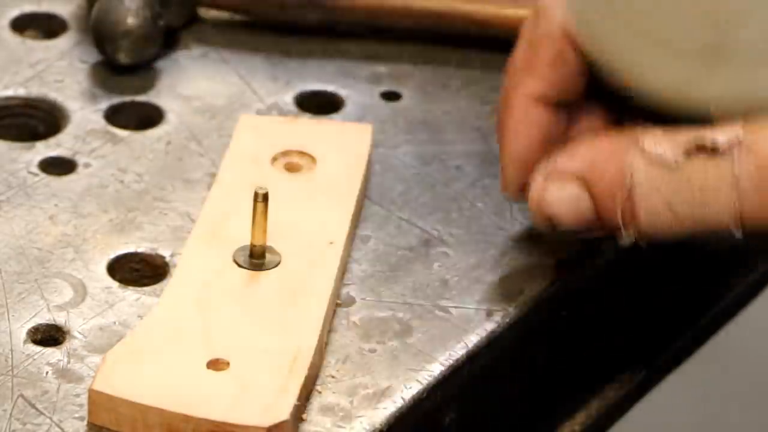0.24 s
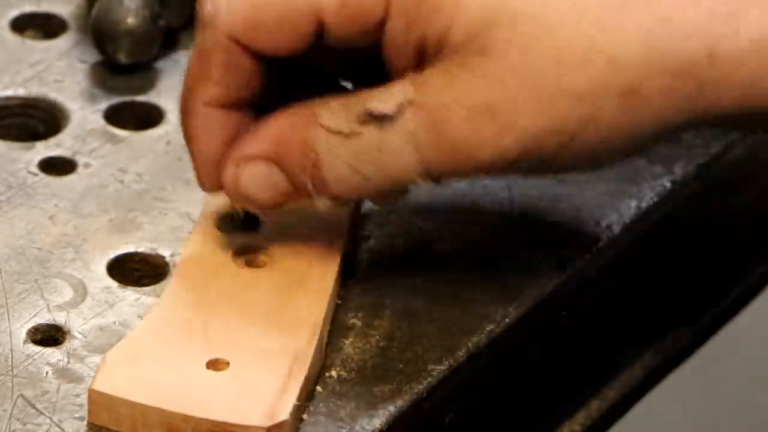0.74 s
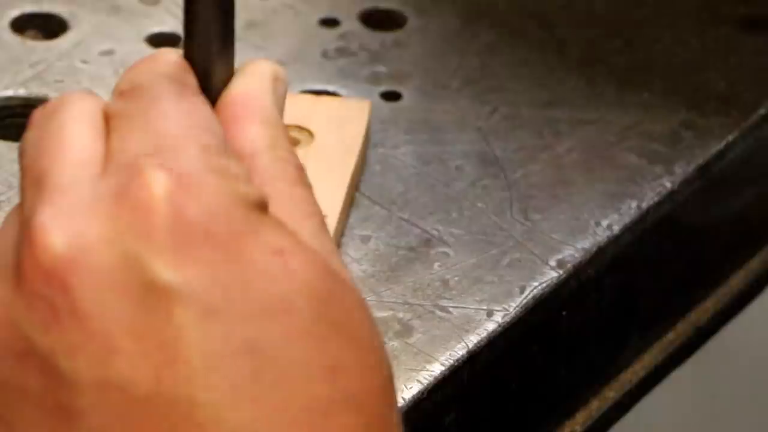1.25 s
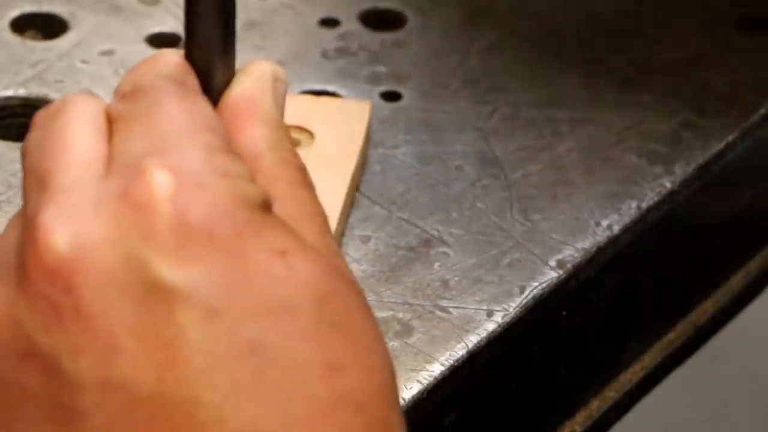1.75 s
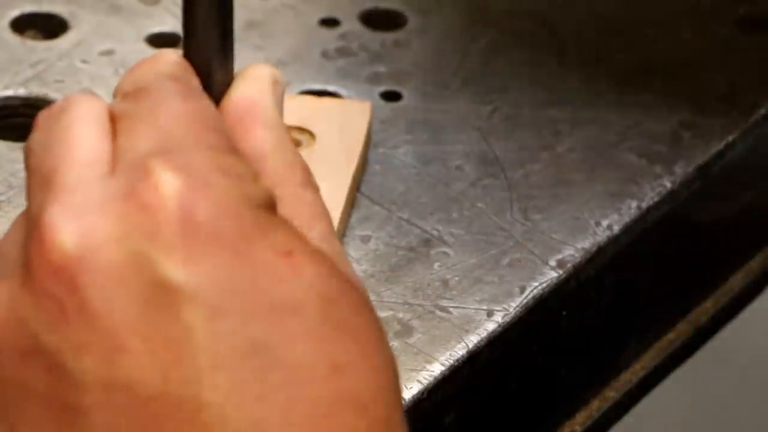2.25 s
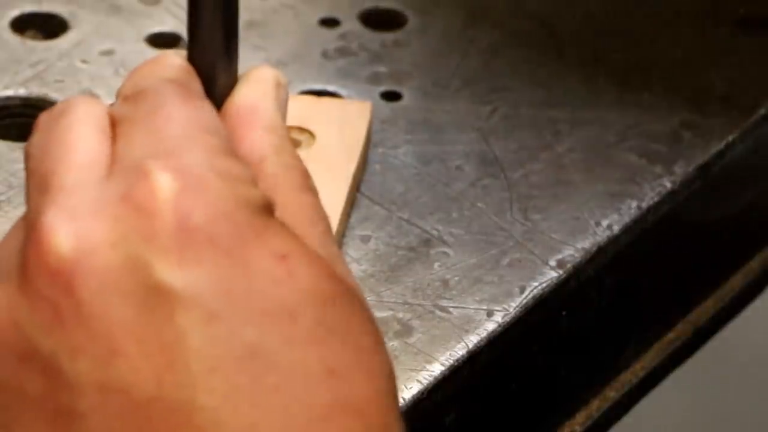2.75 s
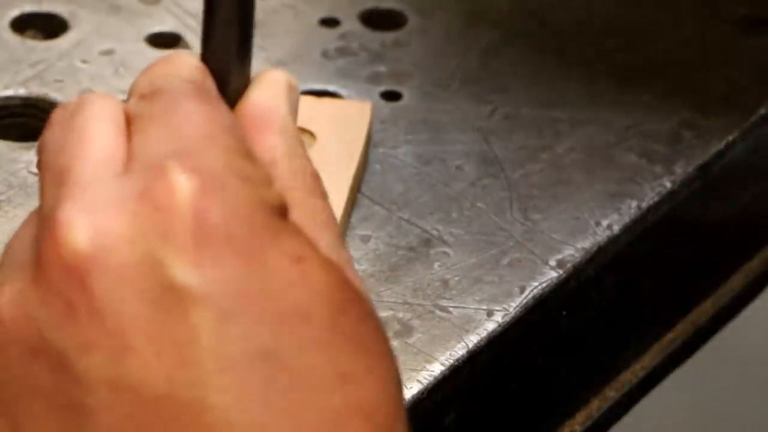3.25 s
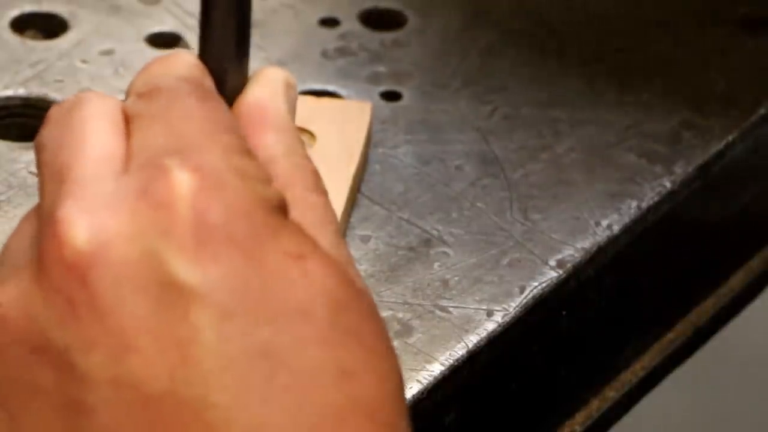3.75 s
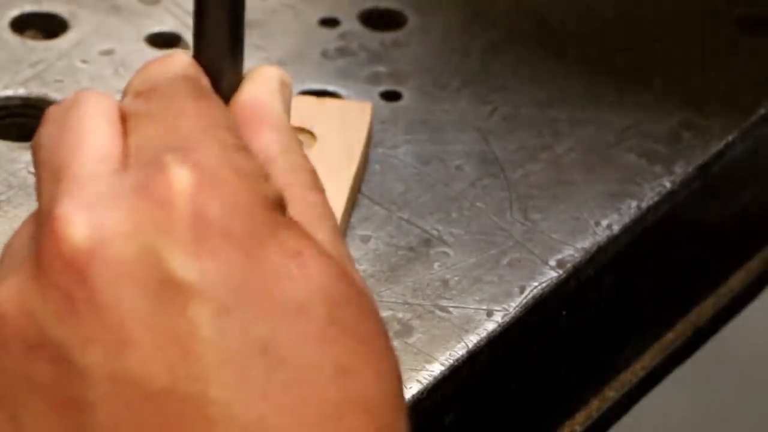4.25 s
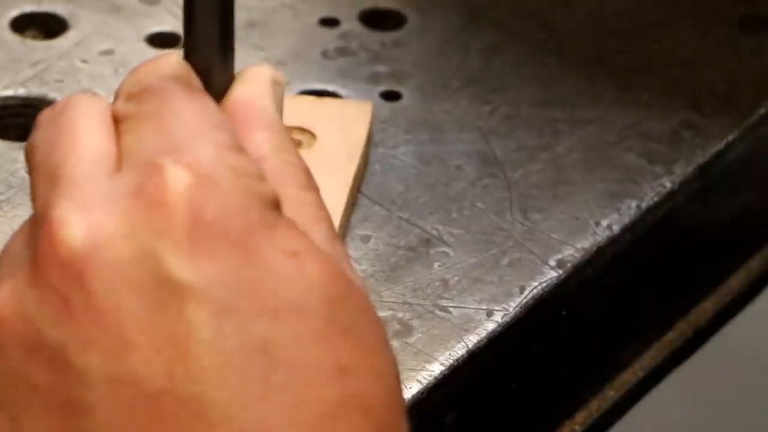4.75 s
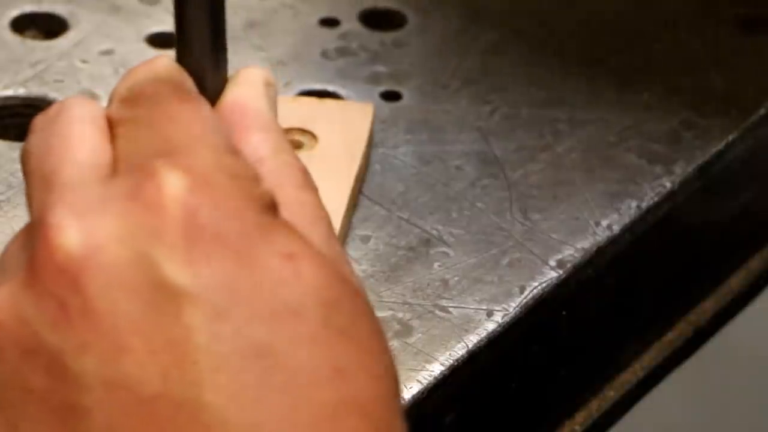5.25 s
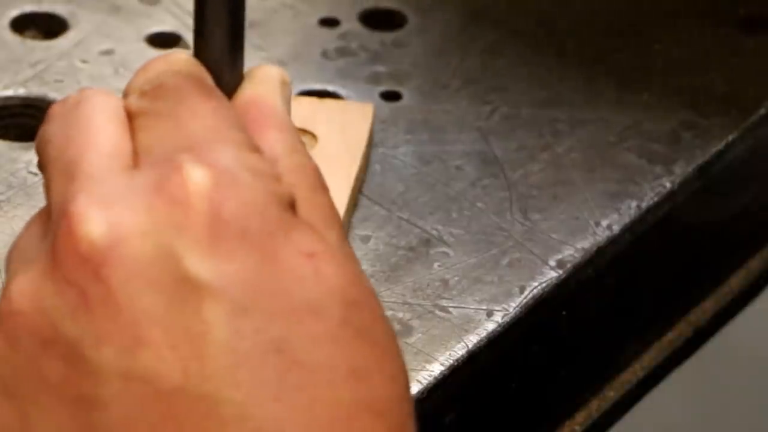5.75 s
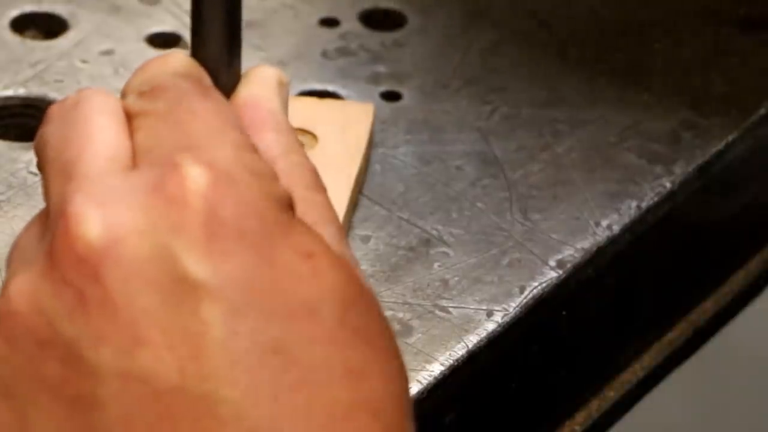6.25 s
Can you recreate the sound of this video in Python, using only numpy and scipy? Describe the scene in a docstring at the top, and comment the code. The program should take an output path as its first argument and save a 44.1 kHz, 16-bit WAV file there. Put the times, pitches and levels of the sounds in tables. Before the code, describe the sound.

Close mono sound at a steel workbench: soft fan noise, faint handling ticks, a punch set down on a pin, then six loud, evenly paced hammer strikes. Steel cracks sharply against steel, wood knocks on the plate, and the plate clangs briefly. Some blows have a tiny chattering rebound. The attacks distort, and gain control pulls up the short, bright room tail between them.

```python
"""In a small workshop, light touches and ticks lead into six hammer blows while a fan runs behind.
The hammer drives a hand-held steel punch onto a pin in a wooden handle scale on a steel bench plate.
Noise bursts make the cracks, decaying sines the knocks and rings, and filtered noise the fan.
The close mono microphone overloads; its gain control ducks each blow, then lifts the reverberation back up."""
import sys
import numpy as np
from scipy import signal
from scipy.fft import rfft, irfft
from scipy.io import wavfile
from scipy.ndimage import uniform_filter1d

SR = 44100
rng = np.random.default_rng(int(sys.argv[2]) if len(sys.argv) > 2 else 0)


def wrap_up_sound(samples):
    """Save the sound to the file named by the first command line argument, as 16-bit audio."""
    columns = np.atleast_2d(samples).T
    # keep every value between -1 and 1, then stretch to whole-number steps
    tamed = np.clip(columns, -1, 1)
    steps = np.round(tamed * 32767).astype(np.int16)
    wavfile.write(sys.argv[1], SR, steps)


N = 286209   # length [samples]
WOOD_LAG_S = 0.0045   # the wood is driven down a moment after the contact


def from_db(db):
    """Turns decibels into an amplitude factor."""
    return 10 ** (np.asarray(db) / 20)


def rms_one(x):
    """Scales a sound to rms 1."""
    return x / np.sqrt(np.mean(x ** 2) + 1e-20)


def at_hz(points, hz):
    """Reads a table along a log-frequency axis."""
    knots, values = np.transpose(points)
    return np.interp(np.log(np.maximum(hz, 1)), np.log(knots), values)


def coloured_noise(spectrum, size):
    """Steady noise of the given colour, at rms 1."""
    hz = np.fft.rfftfreq(size, 1 / SR)
    white = rfft(rng.standard_normal(size))
    return rms_one(irfft(white * from_db(at_hz(spectrum, hz)), size))


def resonance(x, hz, width_hz):
    """Two-pole band-pass with about unit gain on top; a narrower width rings longer."""
    r = np.exp(-np.pi * width_hz / SR)
    b = np.array([1, 0, -1]) * (1 - r * r) / 2
    a = [1, -2 * r * np.cos(2 * np.pi * hz / SR), r * r]
    return signal.lfilter(b, a, x)


def peak(x, hz, width_hz, db):
    """Lifts or cuts one band."""
    w, spread, half_gain = 2 * np.pi * hz / SR, np.pi * width_hz / SR, from_db(db / 2)
    b, a = ([1 + side, -2 * np.cos(w), 1 - side] for side in (spread * half_gain, spread / half_gain))
    return signal.lfilter(b, a, x)


def fade(t, t60):
    """Free decay from t = 0, silent before; it falls 60 dB in t60 seconds."""
    return (t >= 0) * np.exp(-np.log(1000) * np.maximum(t, 0) / t60)


def add(out, s, sound):
    """Mixes a sound in at time s [s]."""
    start = int(round(s * SR))
    out[start:start + len(sound)] += sound[:N - start]


# colour of the steady air noise and hiss: (frequency [Hz], relative level [dB])
AIR_COLOUR = [(15, -56), (25, -22), (64, -14), (96, -25), (133, -5.5), (227, -5), (305, -9.5), (331, -4.5),
              (359, -19), (399, -6.5), (567, -8.5), (722, -5.5), (2850, -35.5), (8810, -22.5), (15500, -29)]
# fan rumble and housing resonances: (frequency [Hz], width [Hz], rms level [dB])
FAN_RESONANCES = [(28, 6.2, -46), (64.4, 44, -56), (150, 22, -48), (232, 27, -47), (337.4, 19, -51),
                  (760, 55, -51.5), (1425, 560, -46.5)]


def fan():
    """Steady air noise with a few hollow resonances, over a faint rumble."""
    drone = np.zeros(N)
    for hz, width_hz, level_db in FAN_RESONANCES:
        drone += from_db(level_db) * rms_one(resonance(rng.standard_normal(N), hz, width_hz))
    air = from_db(-41.5) * coloured_noise(AIR_COLOUR, N)
    return air + drone


def tap(level_db, hz, width_hz, t60):
    """A light contact: a dying noise burst excites one resonance, at the given peak level."""
    t = np.arange(SR // 2) / SR
    burst = rng.standard_normal(len(t)) * fade(t, t60)
    tick = resonance(burst, hz, width_hz)
    return from_db(level_db) * tick / np.abs(tick).max()


# light touches of the parts being handled:
# (time [s], peak level [dB], ring frequency [Hz], width [Hz], t60 of the burst [s])
TOUCHES = [(0.895, -41, 3630, 500, .25), (1.019, -33, 1500, 400, .06), (1.135, -37, 2030, 150, .15)]
# the punch ticks as it is set on the pin:
# (frequency [Hz], width [Hz], peak level [dB], t60 of the burst [s])
PUNCH_TICK = [(3700, 1400, -38, .1), (4850, 450, -30, .028), (8300, 370, -34, 0.02)]


def handling():
    """Before the first blow the parts are touched and the punch is set on the pin."""
    out = np.zeros(N)
    for s, level_db, hz, width_hz, t60 in TOUCHES:
        add(out, s, tap(level_db, hz, width_hz, t60))
    tick = sum(tap(level_db, hz, width_hz, t60) for hz, width_hz, level_db, t60 in PUNCH_TICK)
    add(out, 1.113, tick)
    return out


def low_push(t, hz, t60):
    """One low, dying sine under the blow, as the overloaded microphone gives."""
    return np.sin(2 * np.pi * hz * t) * fade(t, t60)


def bench(t, level_db, low_hz, high_hz, t60, build_s):
    """The bench frame's crowded low modes, as banded noise, fill in between the plate's rings."""
    band = signal.butter(2, [low_hz, high_hz], "band", fs=SR, output="sos")
    crowd = rms_one(signal.sosfilt(band, rng.standard_normal(len(t))))
    return from_db(level_db) * crowd * np.minimum(t / build_s, 1) * fade(t, t60)


# long rings of the bench plate: (frequency [Hz], relative level [dB], t60 [s])
PLATE_RINGS = [(249, -8.5, 0.22), (693, -1, 0.2), (868, 6.5, 0.2), (931, -1.5, 0.38), (970, 1, 0.24),
               (1236, -3, 0.18), (1313, -0.5, 0.22), (1360, -17, 0.47), (1552, -16, 0.47),
               (1825, -8.5, 0.27), (2060, -6, 0.27), (2160, -6, 0.26), (2360, -16, 0.28), (2412, -14, 0.29),
               (2780, -15.5, 0.45), (2950, -11, 0.29), (2925, -15, 0.3), (3500, -19, 0.52),
               (3584, -15, 0.37)]


def plate(t, level_db, push_s, blur, waver_per_s):
    """The pin bottoms out just after the contact and rings the plate; reflections make each mode waver."""
    knots = np.arange(40) / waver_per_s
    diffuse = blur * np.minimum(t * waver_per_s, 1)   # the reflections take a moment to build up
    out = np.zeros(len(t))
    for k, (hz, db, t60) in enumerate(PLATE_RINGS):
        drift = rng.standard_normal(len(knots)) + 1j * rng.standard_normal(len(knots))
        echoes = np.interp(t, knots, drift)
        swing = (1 + diffuse * echoes) / np.sqrt(1 + diffuse ** 2)
        tone = np.imag(swing * np.exp(2j * np.pi * hz * (t - push_s)))
        polarity = (-1) ** k   # neighbouring modes start in opposite directions
        out += from_db(db + level_db) * polarity * tone * fade(t - push_s, t60)
    return out


def rings(t, modes, level_db, vary_db):
    """Struck modes that die away as sines, a little different in level on every blow."""
    out = np.zeros(len(t))
    for (hz, db, t60), luck_db in zip(modes, rng.normal(0, vary_db, len(modes))):
        out += from_db(level_db + db + luck_db) * np.sin(2 * np.pi * hz * t) * fade(t, t60)
    return out


# short rings of hammer head and pin: (frequency [Hz], relative level [dB], t60 [s])
STEEL_RINGS = [(1530, 4.5, 0.038), (2220, -1.5, 0.15), (2410, 4, 0.14), (2788, -0.5, 0.12),
               (2910, -1, 0.16), (3270, -1, 0.11), (3592, 0, 0.2), (4180, 7.5, 0.033), (4864, 9, 0.029)]
# knock of the wood against the plate: (frequency [Hz], relative level [dB], t60 [s])
WOOD_KNOCK = [(347, -7.5, 0.11), (560, 6.5, 0.048), (570, 9.5, 0.088), (837, 16.5, 0.021), (1293, 4, 0.056)]


def knock(t):
    """Hammer head and pin ring at once, the wood a moment later as it is driven against the plate."""
    steel = rings(t, STEEL_RINGS, level_db=-1.0, vary_db=0.8)
    wood = rings(t - WOOD_LAG_S, WOOD_KNOCK, level_db=-1.0, vary_db=0.1)
    return steel + wood


def snap(t, level_db, hz, width_hz, t60):
    """Steel meets steel: a brief, bright click of band-passed noise."""
    return from_db(level_db) * resonance(rng.standard_normal(len(t)), hz, width_hz) * fade(t, t60)


# colour of the crack as it spreads through the room, also of the shimmer:
# (frequency [Hz], relative level [dB])
CRACK_COLOUR = [(40, -16), (130, -18.5), (300, -7), (450, -13), (800, -4.5), (1100, -20), (1400, -3),
                (1700, -8), (2300, -1.5), (2550, -6), (2900, -0.5), (4500, -7.5), (9000, -5.5),
                (10800, -9.5), (15500, -8.5)]


def shimmer(t, pitches, level_db, t60):
    """The plate's crowded upper modes; each blow excites them with new strengths and phases."""
    sizes = rng.rayleigh(1, len(pitches)) * from_db(at_hz(CRACK_COLOUR, pitches))
    phases = np.exp(2j * np.pi * rng.random(len(pitches)))
    lines = np.zeros(len(t) // 2 + 1, complex)
    lines[(pitches * len(t) / SR).astype(int)] = sizes * phases
    return from_db(level_db) * rms_one(irfft(lines, len(t))) * fade(t, t60)


# workshop reverberation: (frequency [Hz], t60 [s])
WORKSHOP_DECAY = [(100, 0.71), (600, 0.46), (1500, 0.45), (3000, 0.46), (6000, 0.66), (9000, 0.55),
                  (12000, 0.54), (16000, 0.4)]


def crack_in_room(t, near_db, near_t60, tail_db):
    """A sharp contact: dense reflections off the bench, and the room's tail dying band by band."""
    hz = np.fft.rfftfreq(len(t), 1 / SR)
    diffuse = rfft(coloured_noise(CRACK_COLOUR, len(t)))
    centres = np.geomspace(100, 16000, 16)
    band = np.searchsorted(np.sqrt(centres[1:] * centres[:-1]), hz)
    tail = np.zeros(len(t))
    for k, centre_hz in enumerate(centres):
        tail += irfft(diffuse * (band == k), len(t)) * fade(t, at_hz(WORKSHOP_DECAY, centre_hz))
    near = coloured_noise(CRACK_COLOUR, len(t)) * fade(t, near_t60)
    return from_db(near_db) * near + from_db(tail_db) * tail


# punch resonances, damped by the hand:
# (frequency [Hz], width [Hz], boost held upright [dB], boost fully tilted [dB])
PUNCH_MODES = [(3530, 220, 6, -2), (4070, 460, -1, 12), (4580, 210, 3.5, 8), (5960, 175, 9.5, 0.5),
               (7000, 670, -5.5, 2.5), (7920, 660, 4.5, 3.5), (9470, 330, -7.5, 13)]


def punch(crack, tilt):
    """Held upright the punch rings near 6 kHz; tilting it hands the ring over to its other modes."""
    for hz, width_hz, upright_db, tilted_db in PUNCH_MODES:
        crack = peak(crack, hz, width_hz, upright_db + tilt * (tilted_db - upright_db))
    return crack


def bounce(x, share, delay_s):
    """A second contact right after the first ripples the spectrum, at about the same overall power."""
    steps = np.arange(len(x))
    again = np.interp(steps - delay_s * SR, steps, x, left=0)
    return (x + share * again) / np.sqrt(1 + share ** 2)


def contact(x, lobe_hz, lobe_db, notch_db, width_hz, above_db):
    """The force pulse leaves a notch and a last lobe in the treble, and dulls all above it."""
    notched = peak(x, lobe_hz - 880, width_hz, notch_db)
    shaped = peak(notched, lobe_hz, width_hz, lobe_db)
    corner_hz = lobe_hz + width_hz / 2
    below = signal.sosfilt(signal.butter(21, corner_hz, "low", fs=SR, output="sos"), shaped)
    above = signal.sosfilt(signal.butter(21, corner_hz, "high", fs=SR, output="sos"), shaped)
    return below + from_db(above_db) * above


# hammer blows: (time [s], force on all but the low push [dB], low push level [dB],
# last treble lobe of the crack [Hz], tilt of the punch [0-1], share of the bounce [0-1])
BLOWS = [(1.3469, -1, -3, 11660, 0.4, 0.06), (2.2756, 2, -26, 10830, 0.2, 0.18),
         (3.2466, 1, -3, 11330, 0.23, 0.22), (4.1918, 0, -28, 11750, 0.53, 0.16),
         (5.2171, -3.5, -14, 12230, 0.98, 0.22), (6.1374, -0.5, -25, 10030, 0.05, 0)]
# the punch chatters on the pin after a blow: (time [s], level [dB])
REBOUNDS = [(1.391, 9), (2.311, 9), (4.2258, 6)]


def hammering():
    """Each blow: a punch-coloured crack, knock and ring of wood and plate, a low push from the overload."""
    t, out = np.arange(SR * 3 // 4) / SR, np.zeros(N)
    upper_modes = rng.uniform(2300, 12000, 520)   # [Hz], shared by all blows
    for s, force_db, push_db, lobe_hz, tilt, share in BLOWS:
        crack = crack_in_room(t, near_db=15.5, near_t60=0.067, tail_db=-2.5)
        crack = crack + shimmer(t, upper_modes, level_db=-10.5, t60=0.58)
        struck = bounce(punch(crack, tilt), share, delay_s=0.0003365)
        steel = contact(struck, lobe_hz, lobe_db=4, notch_db=-3, width_hz=820, above_db=-7.5)
        steel = steel + snap(t, level_db=21.0, hz=10640, width_hz=6300, t60=0.013)
        body = plate(t, level_db=-2.5, push_s=WOOD_LAG_S, blur=0.58, waver_per_s=24) + knock(t)
        body = body + bench(t, level_db=-3, low_hz=500, high_hz=1500, t60=0.25, build_s=0.0041)
        low = from_db(push_db) * low_push(t, hz=74, t60=0.036)
        add(out, s, from_db(force_db) * (steel + body) + low)
    for s, level_db in REBOUNDS:
        add(out, s, snap(t, level_db, hz=5500, width_hz=4000, t60=0.016))
    return out


def scene():
    """Fan, handling and blows, the same in both channels."""
    return np.tile(fan() + handling() + hammering(), (2, 1))


def gain_control(x, threshold_db, release_db_per_s, attack_s, window_s):
    """Ducks within milliseconds of a loud sound and recovers at a steady rate in dB."""
    power = uniform_filter1d(x[0] ** 2, int(window_s * SR))
    over_db = np.maximum(10 * np.log10(np.maximum(power, 1e-12)) - threshold_db, 0)
    slope_db = release_db_per_s * np.arange(N) / SR
    held_db = np.maximum.accumulate(over_db + slope_db) - slope_db   # peaks held, sinking steadily
    r = np.exp(-1 / (attack_s * SR))
    reduction_db = signal.lfilter([1 - r], [1, -r], held_db)
    return x * from_db(-reduction_db)


def record(dry):
    """The gain control is too slow for the attack, which clips flat; rumble and top are cut."""
    ducked = gain_control(dry, threshold_db=-8.5, release_db_per_s=124.5, attack_s=0.011, window_s=0.013)
    clipped = np.clip(ducked, -1, 1)
    rumble_cut = signal.sosfilt(signal.butter(2, 80, "high", fs=SR, output="sos"), clipped)
    return signal.sosfilt(signal.ellip(10, .1, 70, 15750, fs=SR, output="sos"), rumble_cut)


dry = scene()
out = record(dry)
wrap_up_sound(out)
```